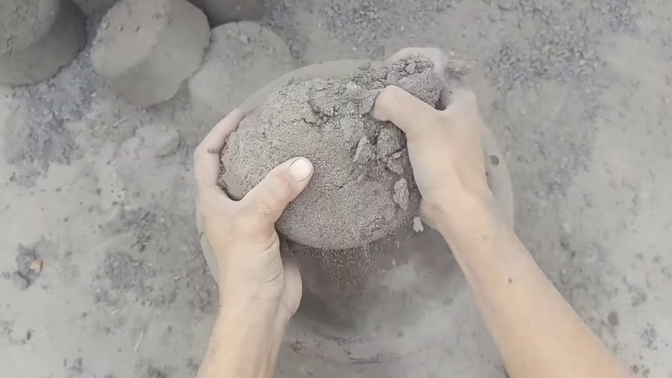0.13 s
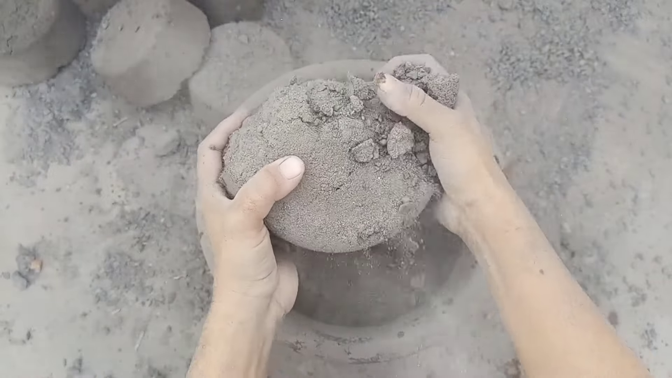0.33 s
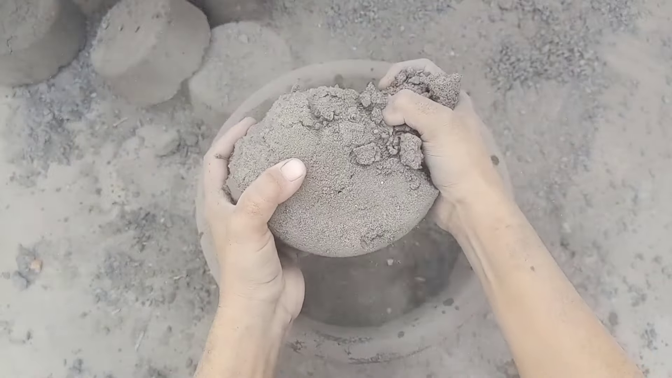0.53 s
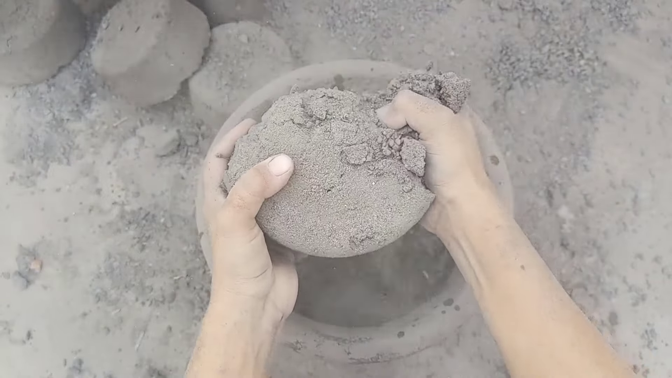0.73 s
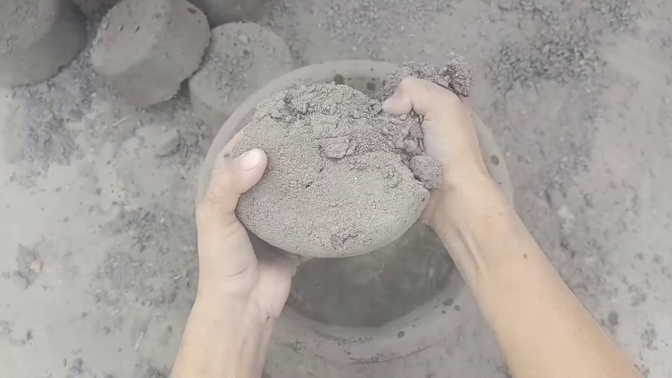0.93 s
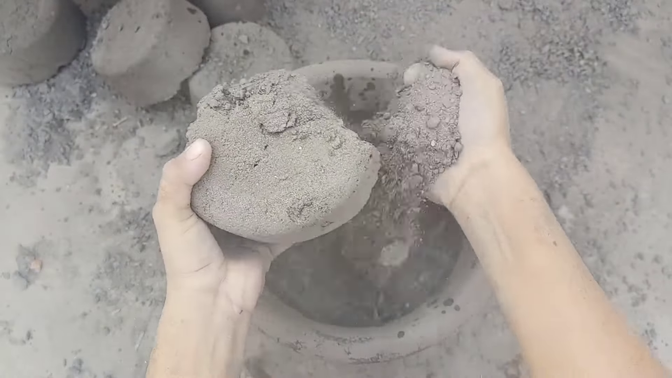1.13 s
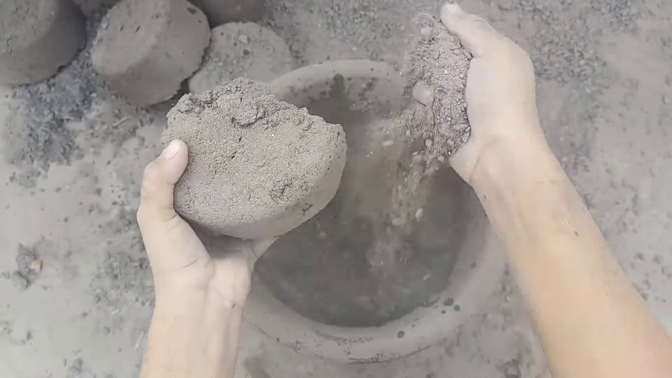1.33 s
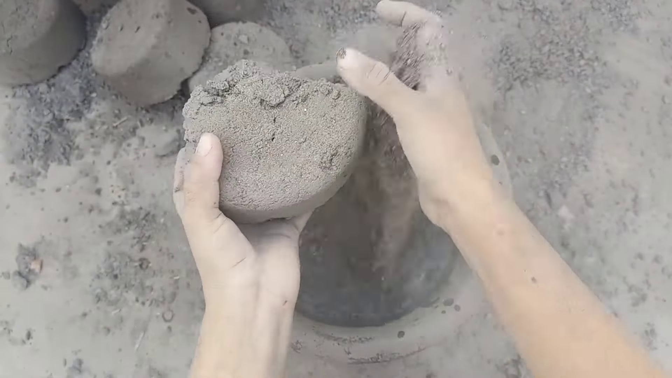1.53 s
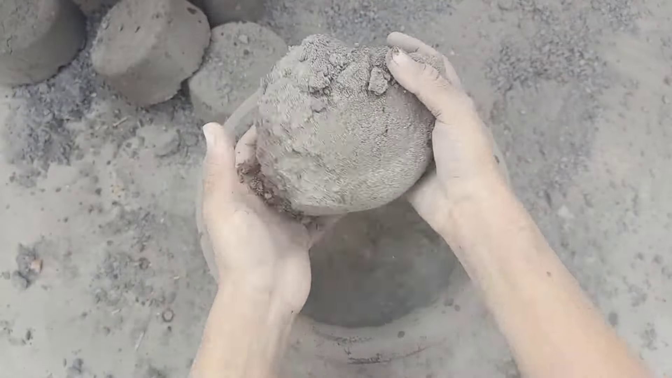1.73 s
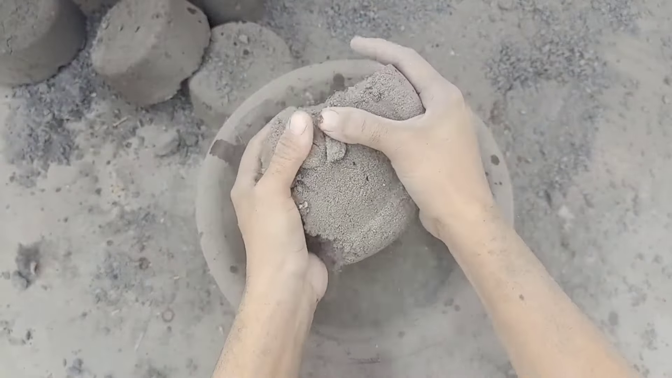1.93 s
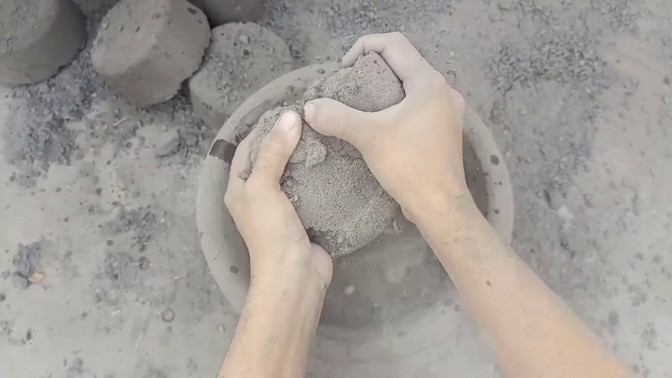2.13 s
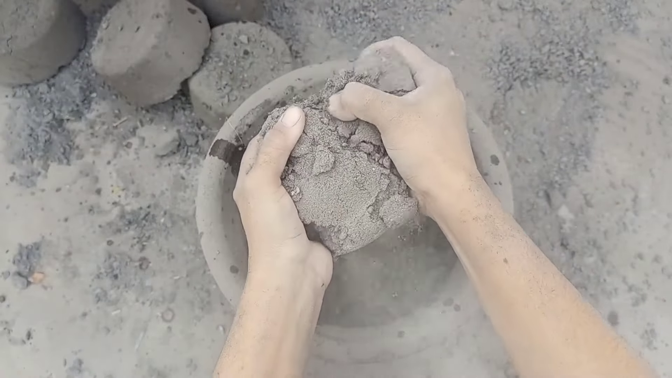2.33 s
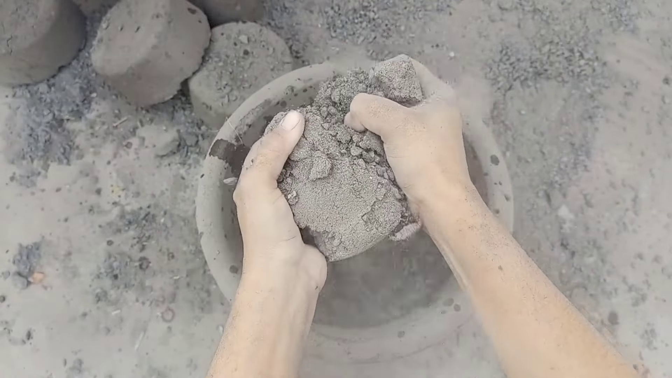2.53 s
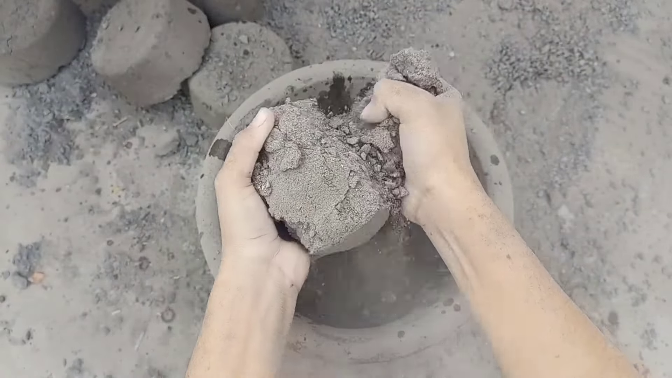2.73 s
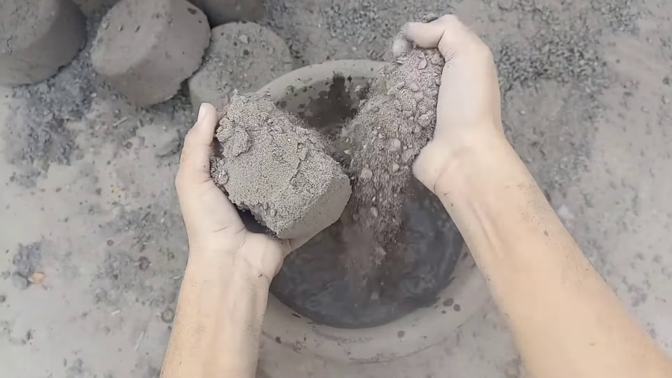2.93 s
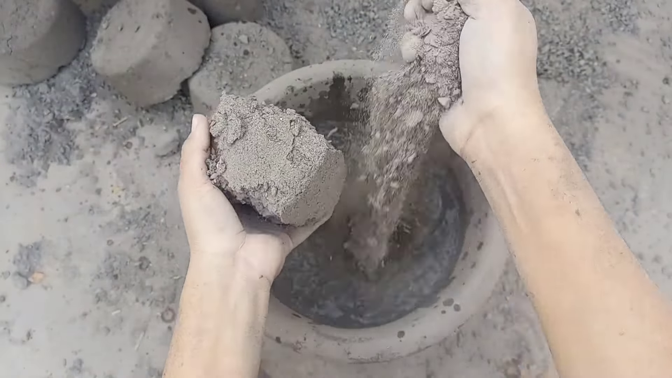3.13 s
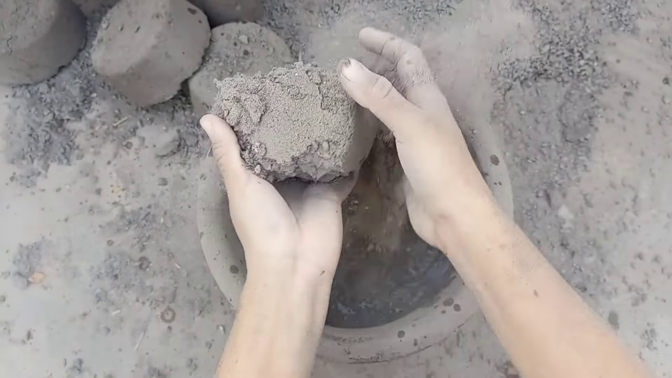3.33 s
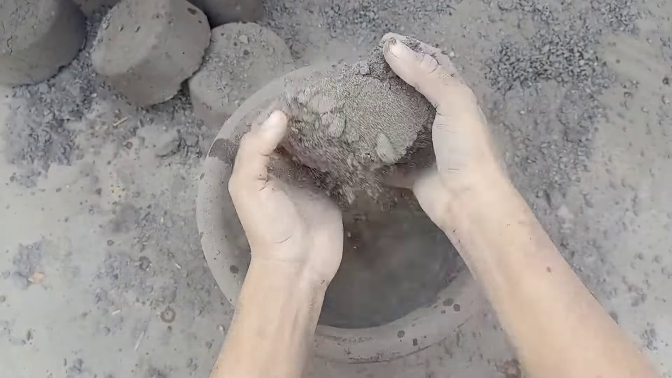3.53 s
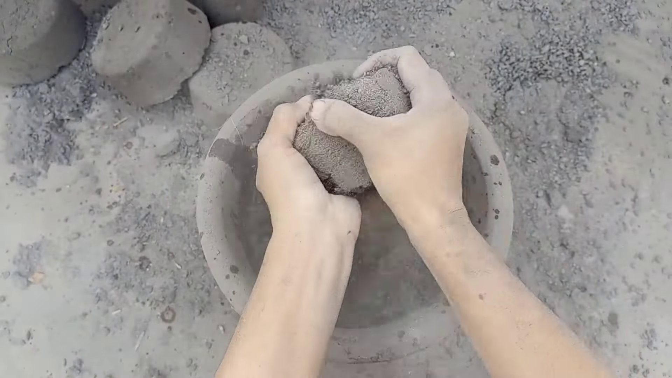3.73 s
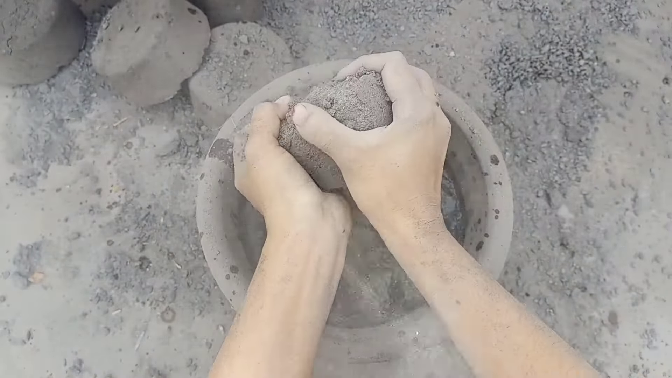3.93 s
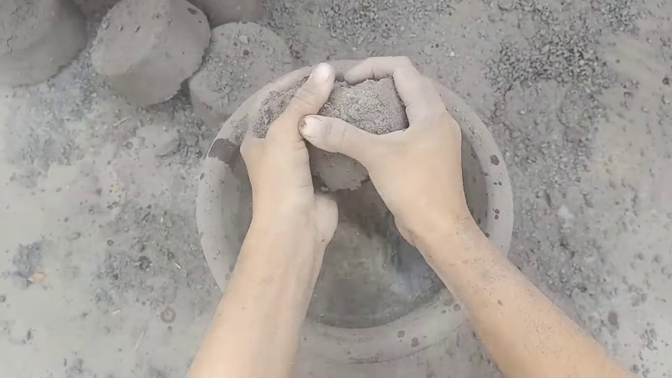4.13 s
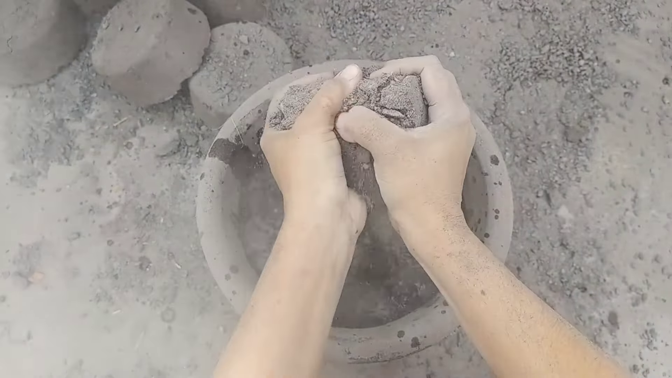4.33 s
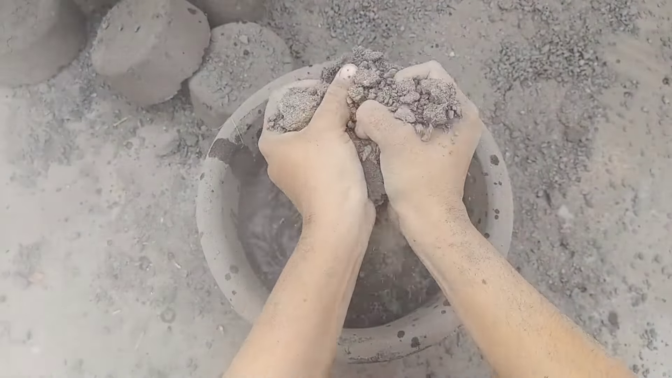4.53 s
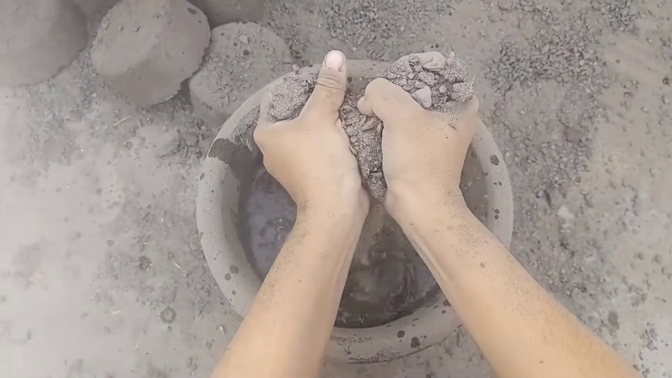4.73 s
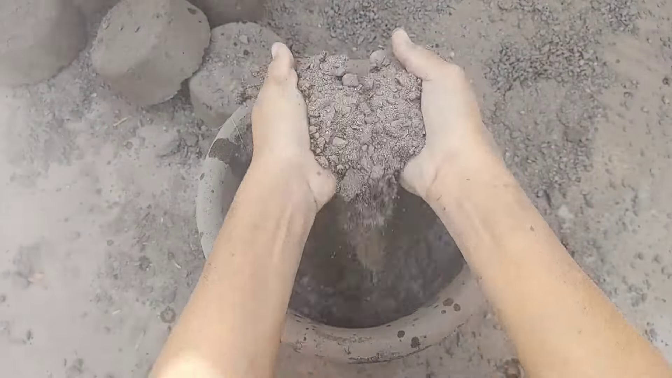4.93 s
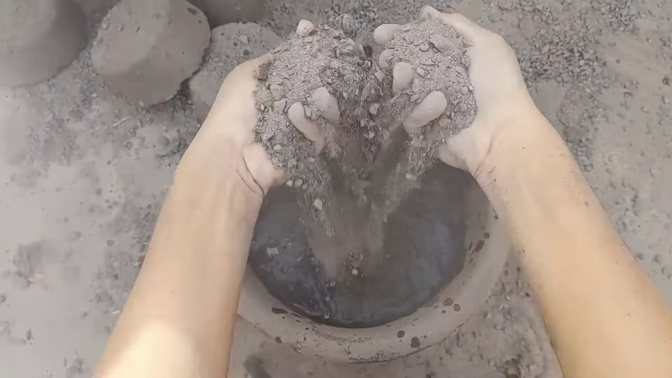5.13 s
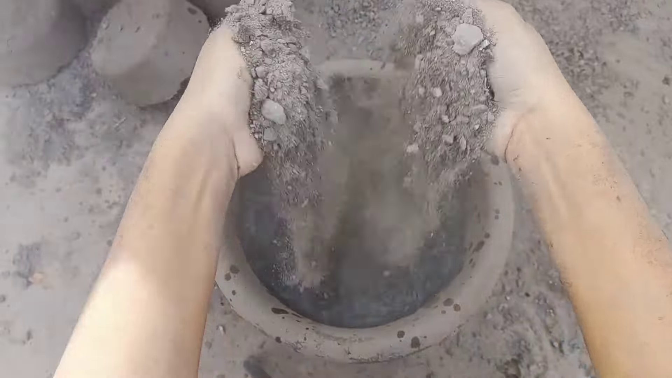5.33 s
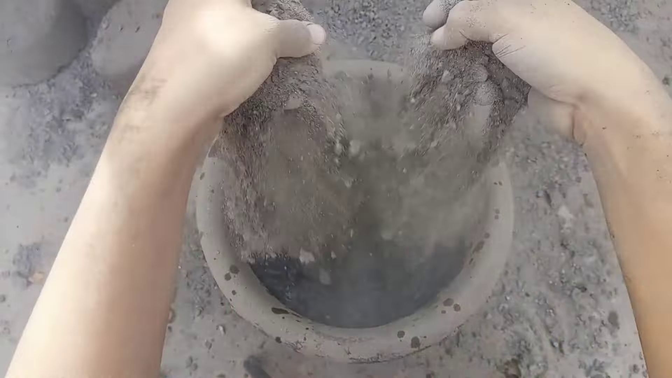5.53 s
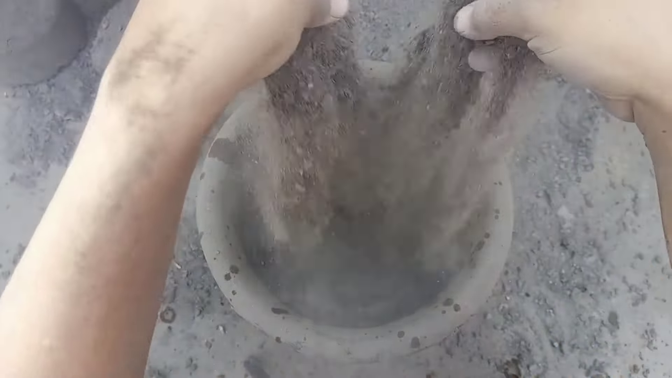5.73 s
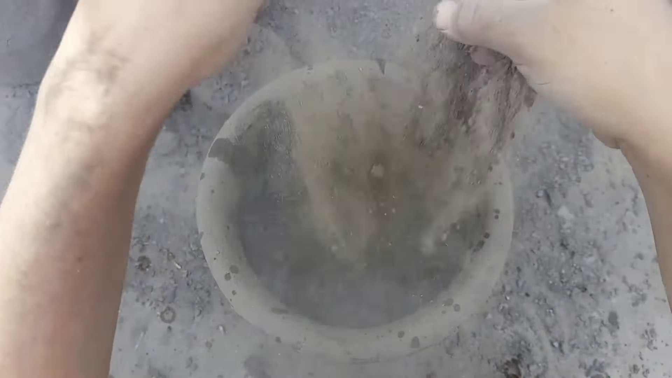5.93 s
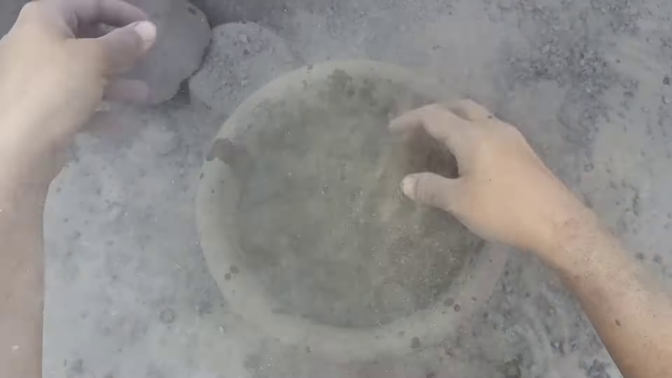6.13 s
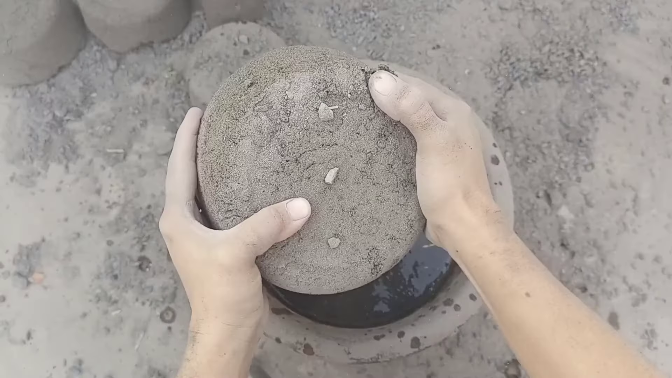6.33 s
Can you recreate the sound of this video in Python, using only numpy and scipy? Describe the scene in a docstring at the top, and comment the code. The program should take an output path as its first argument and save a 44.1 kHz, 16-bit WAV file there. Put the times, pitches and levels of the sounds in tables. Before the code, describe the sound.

Very close, dry sand-cement crumbles in hands with sharp gritty cracks. Lumps plop into a pot of water with short hollow bubbles while sand pours and fizzes in uneven bursts. A hoarse rooster calls across the yard in the first two seconds. It quietens around two and four seconds, then the last handfuls crack, pour and gurgle most densely before stopping. Faint rustle and low handling rumble lie beneath.

```python
"""Lumps plop into a pot of water, sand pours and fizzes, and grit cracks as hands crush a dry
sand-cement block close to a phone. A hoarse rooster calls across the yard; a thin tone whines briefly.
Plops, gurgle and part of the fizz are fading sine bubbles; slaps, sand and grit are shaped noise.
Cracks mix a rough ring with dust noise; the rooster is overtones and noise through throat resonances.
The whine, the handling rumble, the sloshing water and a steady rustle are filtered noise."""
import sys
import numpy as np
from scipy import signal
from scipy.fft import rfft, irfft, next_fast_len
from scipy.io import wavfile
from scipy.ndimage import uniform_filter1d, map_coordinates

SR = 44100
rng = np.random.default_rng(int(sys.argv[2]) if len(sys.argv) > 2 else 0)


def wav_record(signal):
    """Record a signal, one row per channel, as 16-bit PCM in the file named by sys.argv[1]."""
    frames = np.transpose(np.atleast_2d(signal))
    bounded = np.clip(frames, -1, 1)
    # unit amplitude maps onto the largest positive 16-bit level
    quanta = np.round(bounded * 32767).astype(np.int16)
    wavfile.write(sys.argv[1], SR, quanta)


N = 281358

# Lumps hitting the water, each trapping one bubble:
# (time [s], level [dB], starting pitch [Hz], time to fade by 60 dB [ms])
LUMPS = [(.068, -20.5, 1360, 41), (0.1112, -12, 1214, 54), (0.143, -20.5, 1036, 48), (0.1664, -6, 581, 67),
         (0.19, -13.5, 930, 37), (0.2226, -15.5, 1250, 47), (0.285, -11.5, 680, 37),
         (0.298, -11.5, 1860, 17), (0.3088, -15.5, 1257, 104), (0.3363, -11.5, 1303, 49),
         (.361, -7.5, 1060, 18), (0.404, -10, 1243, 57), (0.4232, 6, 640, 8.7), (0.4452, 13.5, 673, 11.5),
         (0.476, 0, 587, 24), (0.7073, -1.5, 700, 19), (.7615, -2.5, 676, 17), (0.9248, 1, 1260, 38),
         (0.9403, -2.5, 565, 48), (0.9798, -5, 1870, 13), (.9807, -0.5, 685, 18.6), (1.0019, -5, 684, 17),
         (1.0145, -1.5, 1340, 14.5), (1.0731, -1.5, 576, 40), (1.102, -4.5, 1470, 20),
         (1.1385, -4.5, 1160, 23), (1.1487, -11, 780, 31), (1.153, -5.5, 324, 30), (1.2894, -2, 620, 22),
         (1.2917, -6, 2700, 14), (1.3117, -4, 600, 24), (1.3416, -0.5, 564, 21), (1.3857, -8.5, 545, 25),
         (1.481, 0, 2820, 18), (1.4979, -10, 2700, 21), (1.571, -8, 2785, 10.2), (1.6024, -9.5, 2800, 40),
         (1.6883, -13, 715, 56), (1.7443, -1.5, 2510, 13.6), (1.941, -23.5, 945, 37), (2.0, -29, 1742, 30),
         (2.3126, 0.5, 686, 38), (2.3158, -8.5, 1180, 28), (2.3799, -13, 656, 34), (2.547, -4.5, 1300, 68),
         (2.65, -12, 1186, 27), (2.6651, -3, 1210, 13), (2.8214, -11.5, 1240, 44), (2.8557, -2, 2330, 10),
         (2.8575, 0, 3960, 10), (2.8788, -3, 556, 29), (2.9777, -11, 510, 37), (3.0169, 2, 474, 25.6),
         (3.0961, -13, 673, 43), (3.1049, -7, 3500, 11), (3.1385, -6, 2800, 18), (3.1709, 0.5, 2710, 11.6),
         (3.2013, -6, 690, 27.5), (3.2857, -8, 633, 36), (3.303, -11.5, 606, 58), (3.3614, -14.5, 2620, 19),
         (3.3744, -9, 603, 48), (3.4078, -13.5, 3580, 24), (3.4187, -1, 497, 38), (3.4805, -3.5, 732, 30),
         (3.5027, 3, 615, 18), (3.5432, -5, 1180, 25), (3.5477, -16, 643, 17), (3.5633, -8, 600, 28),
         (3.62, -23, 1650, 14), (3.638, -24.5, 1600, 21), (3.714, -20, 927, 36), (3.756, -25, 2140, 19),
         (3.841, -19.5, 1430, 11), (3.886, -7, 1840, 16), (3.9095, -14.5, 1265, 38), (4.0236, -15, 704, 59),
         (4.33, -28, 2720, 29), (4.426, -18, 1240, 34), (4.502, -8.5, 750, 45), (4.617, -32, 1300, 20),
         (4.6768, 7.5, 616, 17), (4.6931, -4, 800, 12), (4.749, -13.5, 770, 54), (4.7699, -3.5, 660, 23),
         (4.8557, -5.5, 660, 31), (4.955, -12, 2280, 11), (4.998, 2, 490, 23.7), (5.1084, -12, 710, 50),
         (5.1246, -10, 500, 49), (5.1743, -1, 2530, 9), (5.2747, -7.5, 590, 20), (5.2907, -5.5, 2460, 11.5),
         (5.3474, 7.5, 597, 19.5), (5.39, -13, 713, 51), (5.4247, -10.5, 776, 29), (5.4855, -17.5, 727, 75),
         (5.5661, -14, 2840, 21), (5.5904, -6, 1350, 25), (5.6791, -12, 645, 33), (5.6929, -9, 650, 19),
         (5.7046, -6, 643, 40), (5.7958, -8.5, 780, 17), (5.835, -10, 588, 35), (5.8822, -11, 676, 72),
         (5.9388, -6, 1160, 16), (5.9878, -7, 544, 76), (6.041, -6.5, 1220, 17), (6.0496, 3, 650, 24),
         (6.0662, -15, 596, 13), (6.129, -21, 1095, 53), (6.329, -34, 235, 230), (6.368, -18, 237, 39)]
# Tone colour of grit and dust: (frequency [Hz], gain [dB])
GRIT_COLOUR = [(1200, -43), (2500, -41.5), (4500, -17.5), (6500, -2.5), (7130, -9.5), (8260, -8.5),
               (9820, 3), (10900, 1.5), (13400, -13), (15200, -2), (16000, 0), (16400, -3)]


def amp(db):
    """Turn decibels into an amplitude factor."""
    return 10 ** (np.asarray(db) / 20)


def unit(x):
    """Scale a signal to an average (RMS) strength of 1."""
    return x / np.sqrt(np.mean(x ** 2) + 1e-20)


def curves(rows):
    """Draw straight lines between table rows: one value per sample for each column after the time."""
    s, *columns = np.transpose(rows)
    return [np.interp(np.arange(N) / SR, s, column) for column in columns]


def per_sample(x):
    """Read a millisecond curve at every sample."""
    return np.interp(np.arange(N) / SR * 1000, np.arange(len(x)), x)


def swells(start, length, db, rise, fall):
    """Amplitudes of events on a millisecond grid, one row each: a smooth rise, a hold, an exponential fall."""
    t = np.arange(0, N / SR + .002, .001) - np.asarray(start)[:, None]
    over = np.maximum(t - np.reshape(length, (-1, 1)), 0)
    rising = np.sin(np.pi / 2 * np.clip(t / rise, 0, 1)) ** 2
    return amp(db)[..., None] * rising * np.exp(-over / fall)


def wobble(rate):
    """A smooth random curve with this many random points a second."""
    points = rng.standard_normal(int(N * rate / SR) + 4)
    return map_coordinates(points, [np.arange(N) * rate / SR])


def filtered(x, response):
    """Multiply the spectrum of x by a response that depends on frequency."""
    m = next_fast_len(N + SR // 2)
    return irfft(rfft(x, m) * response(np.fft.rfftfreq(m, 1 / SR)), m)[:N]


def colour(points):
    """Gain read between (frequency [Hz], gain [dB]) points on a logarithmic frequency axis."""
    f, db = np.transpose(points)
    return lambda hz: amp(np.interp(np.log(hz + 1), np.log(f), db, left=-120, right=-120))


def resonant(modes):
    """Response of resonances (centre [Hz], width [Hz], level [dB]), added with alternating signs."""
    def response(f):
        return sum((-1) ** k * amp(db) * 1j * f * width / (centre ** 2 - f ** 2 + 1j * f * width)
                   for k, (centre, width, db) in enumerate(modes))
    return response


def add_at(s, sounds, total):
    """Lay short sounds, one a row, over silence at their start times."""
    at = np.round(s * SR).astype(int)[:, None] + np.arange(sounds.shape[1])
    return np.bincount(at.ravel(), sounds.ravel(), total)[:N]


def bubbles(s, db, hz, t60, rise, size):
    """Fading sines that start within about a cycle and climb in pitch as the bubble nears the surface."""
    t = np.arange(size) / SR
    db, hz, t60 = (np.asarray(v)[:, None] for v in (db, hz, t60))
    phase = 2 * np.pi * hz * t * (1 + rise * t / t60)
    soft_start = (1 - np.exp(-t * hz / 1.18)) ** 2
    ring = amp(db - 60 * t / t60) * soft_start * np.sin(phase)
    return add_at(s, ring, N + size)


def swarm(count, hz, spread, cycles, scatter_db, size):
    """Many random bubbles with pitches scattered around hz, a few of them louder than the rest."""
    when, loud = rng.random((count, 2)).T
    pitch = hz[(when * N).astype(int)] * np.exp(spread * rng.standard_normal(count))
    pitch = np.clip(pitch, 100, SR / 3)
    db = -scatter_db * np.log(loud + 0.019)
    # each fades by 60 dB in the given number of cycles, or is cut off at size samples
    return unit(bubbles(when * N / SR, db, pitch, cycles / pitch, 0.083, size=size))


def crackle(rate, scatter_db, clump_db, hiss_db):
    """Grains of unequal size, each a sharp tick with a short rough tail, in clumps, over a fine hiss."""
    hit, loud = rng.random((2, N))
    ticks = (hit < rate / SR) * amp(-scatter_db * np.log(loud + .004))  # rate: ticks a second on average
    tails = signal.lfilter([1], [1, -np.exp(-1 / (0.0003 * SR))], ticks)
    grains = unit(tails * rng.standard_normal(N))
    hiss = amp(hiss_db) * rng.standard_normal(N)
    return unit(amp(clump_db * wobble(60)) * (grains + hiss))


def streaky(x, depth_db, bins, frames):
    """Narrow bands brighten and fade as froth cavities form and burst; broad patches change faster."""
    spectrum = signal.stft(x, nperseg=512, noverlap=384)[2]
    narrow, broad = rng.standard_normal((2, *spectrum.shape))
    for _ in range(2):  # smoothing twice rounds the patches
        narrow = uniform_filter1d(uniform_filter1d(narrow, bins, axis=0), frames, axis=1)
        broad = uniform_filter1d(uniform_filter1d(broad, 5 * bins, axis=0), frames // 2, axis=1)
    patches = unit(unit(narrow) + .6 * unit(broad))
    return signal.istft(spectrum * amp(depth_db * patches), nperseg=512, noverlap=384)[1][:N]


def plops():
    """Each lump traps a bubble that rings, and slaps the surface with a short burst of noise."""
    # Tone colour of the surface breaking: (frequency [Hz], gain [dB])
    slap_colour = [(600, -30), (1500, 1), (3000, -6), (6000, -22), (15000, -15)]
    slap_db, slap_t60_s = -14.5, 0.017
    onset_db = 5  # makes up for what the soft start takes off a bubble's peak
    s, db, hz, t60_ms = np.transpose(LUMPS)
    t = np.arange(600) / SR
    bursts = amp(db[:, None] - 60 * t / slap_t60_s) * rng.standard_normal((len(s), len(t)))
    slap = filtered(add_at(s, bursts, N), colour(slap_colour))
    ring = bubbles(s, db + onset_db, hz, t60_ms / 1000, 0.033, size=4000)
    ring = filtered(ring, lambda f: (1j * f / (180 + 1j * f)) ** 2)  # thins out the bass below 180 Hz
    return ring + amp(slap_db) * slap


def pouring_levels(steady_db):
    """Add the power of handfuls breaking loose to the steady fall: gains of crumbs, sand and grit."""
    # Handfuls breaking loose:
    # (start [s], length [s], crumbs level [dB], sand level [dB], grit level [dB])
    spurts = [(0.03, 0.083, -61, -28, -28), (0.172, 0.056, -34, -21, -30), (0.308, 0.089, -47, -25, -30.5),
              (0.399, 0.027, -21, -21.5, -28.5), (0.467, 0.021, -15, -18.5, -42),
              (0.611, 0.023, -53, -29, -24), (.8, 0.018, -23, -41, -23), (0.874, 0.047, -43, -26.5, -34),
              (0.916, 0.019, -26, -33, -41), (0.977, 0.016, -39, -16.5, -44), (1.123, 0.036, -17, -21, -31),
              (1.237, 0.096, -33, -18.5, -31), (1.457, 0.077, -63, -22.5, -32),
              (1.592, 0.089, -29, -23, -32), (1.655, 0.12, -44, -20.5, -33), (1.949, 0.07, -42, -39, -34.5),
              (2.036, 0.017, -45, -53, -35), (2.076, 0.038, -52, -27.5, -32.5),
              (2.253, 0.15, -35, -24.5, -29.5), (2.453, 0.027, -35, -33, -42),
              (2.541, 0.075, -49, -24, -29), (2.637, 0.04, -27, -20.5, -37), (2.768, 0.099, -22, -18, -34),
              (2.903, 0.038, -25, -25, -27.5), (3.077, .045, -32, -21, -30), (3.122, 0.043, -51, -21, -30),
              (3.216, 0.04, -37, -23.5, -42), (3.284, 0.069, -33.5, -32, -41), (3.36, 0.025, -29, -27, -20),
              (3.456, 0.11, -23, -18, -25.5), (3.675, 0.049, -47, -42, -52), (3.743, 0.016, -49, -26, -34),
              (3.869, 0.035, -43.5, -28.5, -40), (4.011, 0.02, -34, -37, -38),
              (4.123, 0.045, -49.5, -34, -36), (4.281, 0.066, -52, -28.5, -37),
              (4.412, 0.022, -38.5, -21, -44), (4.492, 0.094, -31.5, -30, -35.5),
              (4.66, 0.044, -35, -25.5, -26), (4.726, 0.069, -21.5, -23, -25), (4.844, 0.02, -42, -23, -27),
              (4.937, 0.013, -40, -25, -43), (5.084, 0.053, -46, -20, -24.5), (5.156, 0.071, -29, -27, -35),
              (5.268, 0.065, -49, -26, -32), (5.354, 0.088, -23, -21.5, -33), (5.549, 0.04, -56, -21, -32),
              (5.571, .05, -24.5, -22, -34), (5.67, 0.06, -27, -25, -18.5), (5.835, 0.12, -23, -26, -32),
              (5.976, 0.14, -50, -21, -30), (6.109, 0.05, -44, -23.5, -28.5), (6.22, 0.04, -46.5, -41, -38),
              (6.37, .03, -17, -9.5, -14)]
    rise_s, fall_s = 0.02, 0.0095
    start, length, *spurt_db = np.transpose(spurts)
    power_shapes = swells(start, length, np.zeros(len(start)), rise_s, fall_s) ** 2
    spurt_power = [per_sample(v) for v in amp(spurt_db) ** 2 @ power_shapes]
    return np.sqrt(amp(steady_db) ** 2 + spurt_power)


def crumb_bubbles(gurgle_hz):
    """Larger and small crumbs make bubbles that gurgle through the pot's air resonances."""
    # Air inside the pot: (centre [Hz], width [Hz], level [dB])
    pot_modes = [(554, 360, -4.5), (1323, 170, 3.5), (2440, 280, -13.5)]
    pot = resonant(pot_modes)
    large = swarm(count=1500, hz=gurgle_hz, spread=0.1493, cycles=26, scatter_db=4, size=1400)
    small = swarm(count=2500, hz=np.full(N, 1350), spread=0.211, cycles=46, scatter_db=5.5, size=800)
    return unit(filtered(large, pot)), unit(filtered(small, pot))


def sand_surface(fizz_hz):
    """Sand grains crackle and tiny bubbles fizz on the water; finer sand fizzes higher and is brighter."""
    # Tone colour of the sand: (frequency [Hz], gain [dB])
    sand_colour = [(940, 0), (1600, -3), (2120, -1), (2740, 4.5), (3110, -4.5), (3360, -2), (3860, -7),
                   (4600, -2.5), (6890, -5.5), (8500, -19), (11000, -61), (18700, -120)]
    fine_hz, fine_grows_db = 3630, 6.5  # start of the fine band; its gain over the rest, dB per fizz octave
    fizz = swarm(count=2500, hz=fizz_hz, spread=0.2094, cycles=210, scatter_db=2.0, size=800)
    sand = crackle(rate=1800, scatter_db=4.8, clump_db=3, hiss_db=-3)
    sand = unit(filtered(streaky(sand, depth_db=6, bins=2, frames=24), colour(sand_colour)))
    fine = filtered(sand, lambda f: 1 / (1 + (fine_hz / (f + 1)) ** 8))
    coarse = sand - fine
    tilt = amp(fine_grows_db / 2 * np.log2(fizz_hz / fine_hz))
    return unit(fine * tilt + coarse / tilt + amp(-9.5) * fizz)


def grit_in_hands():
    """Grit rubs in the hands: uneven grains and hiss with a bright tone colour."""
    grit = crackle(rate=970, scatter_db=5.5, clump_db=2.0, hiss_db=-1.0)
    return unit(filtered(streaky(grit, depth_db=1.5, bins=8, frames=6), colour(GRIT_COLOUR)))


def pouring():
    """Gurgling crumbs, fizzing sand and rubbing grit rise and fall with the flow."""
    # Steady fall: (time [s], crumbs level [dB], sand level [dB], grit level [dB],
    # fizz pitch [Hz], gurgle pitch [Hz])
    trickle = [(0, -52, -34.5, -33, 4850, 590), (.27, -45.5, -30.5, -32, 4500, 652),
               (.46, -20.5, -33.5, -37.5, 3460, 681), (.66, -36, -34.5, -33, 6130, 735),
               (.8, -32, -34.5, -33.5, 3040, 776), (1.14, -23, -34.5, -33, 4300, 678),
               (1.36, -30, -28, -29, 3240, 608), (1.5, -42.5, -35, -36.5, 2840, 497),
               (1.74, -28, -21.5, -25, 3590, 700), (1.83, -42, -43.5, -41, 2840, 710),
               (2.18, -59, -39, -39, 4200, 668), (2.5, -51, -37.5, -37, 3820, 630),
               (2.75, -37, -31, -34, 3016, 637), (3.0, -35, -27, -31, 4310, 514),
               (3.39, -33.5, -24, -32.5, 3110, 602), (3.56, -33, -49, -34, 3420, 602),
               (3.62, -61, -44.5, -36, 3710, 663), (4.16, -57, -41.5, -38, 4480, 607),
               (4.46, -45, -36, -38, 4220, 699), (4.82, -29, -24, -34.5, 4960, 670),
               (5.0, -28.5, -30.5, -34.5, 3440, 532), (5.21, -31, -21.5, -28, 2950, 608),
               (5.53, -41.5, -28, -27, 4900, 683), (5.7, -18.5, -18.5, -24.5, 4300, 650),
               (5.81, -38, -27.5, -31.5, 5200, 642), (6.06, -21, -22.5, -25, 5240, 608),
               (6.25, -60, -33, -35.5, 5760, 700), (6.38, -49, -46, -49, 4670, 735)]
    # small crumbs follow the crumbs by this share and the sand by the rest
    small_db, small_follows = -4.5, 0.72
    *steady_db, fizz_hz, gurgle_hz = curves(trickle)
    crumb_gain, sand_gain, grit_gain = pouring_levels(steady_db)
    small_gain = amp(small_db) * crumb_gain ** small_follows * sand_gain ** (1 - small_follows)
    crumbs, small = crumb_bubbles(gurgle_hz)
    in_water = crumb_gain * crumbs + small_gain * small + sand_gain * sand_surface(fizz_hz)
    return in_water + grit_gain * grit_in_hands()


def cracks():
    """Each snap lasts a few milliseconds: a rough ring of the fragment and a bright spit of dust."""
    # Grit snapping: (time [s], level [dB], ring pitch [Hz], dust share [0-1])
    snaps = [(0.083, -2, 6050, 0.54), (0.157, -3, 7140, 0.8), (0.181, 6, 4220, 0.85),
             (0.243, -2.5, 6260, 0.55), (0.2857, 2.5, 4120, 0.74), (0.422, -6, 4700, 0.7),
             (0.4777, 0.5, 6900, 0.66), (0.5521, -6, 5540, 0.97), (0.6, 3, 6530, 0.6),
             (0.8123, -4, 6320, 0.46), (0.8738, -2, 6890, 0.8), (0.9882, -1, 6360, 0.44),
             (1.1395, -3.5, 5200, 0.7), (1.291, 3.5, 4160, 0.15), (1.4422, -6.5, 3890, 0.15),
             (1.481, -4, 4900, 0.4), (1.603, 4, 3640, 0.24), (1.915, -11, 4200, 0.93),
             (1.962, -8.5, 3480, 0.53), (2.0426, -10, 5070, 0.9), (2.332, 5.5, 5680, 0.84),
             (2.3553, -4.5, 4140, 0.15), (2.5284, -8, 4160, 1), (2.6655, -7, 5140, 0.3),
             (2.7913, -1, 5720, 0.86), (2.8155, -3, 5630, 0.2), (2.8569, -5, 4000, 0.5),
             (2.911, -5, 4380, 0.45), (2.9697, -3, 4200, 0.3), (3.0664, -0.5, 4870, 0.43),
             (3.1048, -14, 3570, 0.4), (3.138, 1, 5130, 0.37), (3.2121, 5, 7140, 0.4),
             (3.2879, 0, 4440, 0.6), (3.3308, -4.5, 4600, 0.2), (3.3764, -1, 7000, 0.74),
             (3.4077, -12, 3610, 0.6), (3.455, -5, 5090, 0.9), (3.501, -3, 4930, 0.3),
             (3.7574, -2, 4570, 0.87), (3.8883, -4.5, 6700, 0.5), (4.4283, -2, 4210, 0.63),
             (4.6763, -8, 4760, 0.8), (4.7496, -2, 5240, 0.7), (4.853, -6, 6490, 0.5),
             (4.8688, 7.5, 5660, 0.42), (5.1733, 0.5, 3720, 0.45), (5.288, 5, 7400, 0.27),
             (5.3133, 1, 6830, 0), (5.3543, 2, 7200, 0.56), (5.437, 3.5, 6070, 0.97),
             (5.5288, 5.5, 5700, 0.72), (5.5501, 4, 4780, 0.16), (5.6043, 9, 4470, 0.57),
             (5.686, -11, 5980, 0.7), (5.7399, 1.5, 6900, 0.27), (5.8267, 3.5, 6430, 0.17),
             (5.9933, 2, 6000, 0.3), (6.023, -0.5, 4250, 0.2), (6.2031, 1, 4100, 0.67)]
    ring, spit, t = np.zeros(N + 500), np.zeros(N + 500), np.arange(500) / SR
    for s, db, hz, share in snaps:
        rough, dust = rng.standard_normal((2, 500))
        share = np.clip(share, 0, 1)
        shape = amp(db - 60 * t / .013) * (1 - np.exp(-t / .0008))
        flutter = unit(np.convolve(rough, np.hanning(24), "same"))
        first = round(s * SR)
        ring[first:][:500] += (1 - share) * shape * (.8 + .7 * flutter) * np.sin(2 * np.pi * hz * t)
        spit[first:][:500] += share * shape * dust
    return ring[:N] + amp(-1.5) * filtered(spit[:N], colour(GRIT_COLOUR))


def rooster():
    """Overtones of an unsteady pitch, hoarse with noise once a cycle, pass the throat and yard echoes."""
    # Notes of the call: (start [s], length [s], starting pitch [Hz], glide [Hz/s],
    # starting level [dB], swell [dB/s], roughness [0-1])
    notes = [(0.425, 0.18, 366.2, 9.5, -27, -32, 0.37), (0.719, 0.15, 276.5, -10, -18, -55, 0.33),
             (0.92, 0.353, 277.5, 18, -21.5, 4, .53), (1.63, 0.34, 700.6, -110, -21.5, -62, 0.15)]
    # Throat resonances: (centre [Hz], width [Hz], level [dB])
    throat_modes = [(783, 136, 3), (1405, 337, 4), (2110, 730, -4)]
    rise_s, fall_s = 0.018, 0.022
    start, length, hz, glide, db, swell, rough = np.transpose(notes)
    time = np.arange(N) / SR
    note = np.clip(np.searchsorted(start, time) - 1, 0, None)  # which note each sample belongs to
    since = np.clip(time - start[note], 0, length[note])
    gain = per_sample(swells(start, length, db, rise_s, fall_s).sum(0)) * amp(swell[note] * since)
    hz, rough = hz[note] + glide[note] * since, np.clip(rough[note], 0, 1)
    phase = 2 * np.pi * np.cumsum(hz * (1 + 0.06 * rough * wobble(25))) / SR
    pulses = sum(np.cos(k * phase) for k in range(1, 10)) / np.sqrt(4.5)
    hoarse = 2.0 * rng.standard_normal(N) * (1 + np.cos(phase))
    throat = resonant(throat_modes)
    voice = filtered(gain * ((1 - rough) * pulses + rough * hoarse), lambda f: throat(f) ** 2)
    t = np.arange(SR // 2) / SR
    echoes = rng.standard_normal(len(t)) * amp(-60 * t / 0.63)  # fade by 60 dB in 0.63 s
    echoed = signal.fftconvolve(voice, echoes / np.linalg.norm(echoes))[:N]
    return amp(3.0) * voice + amp(4.0) * echoed


def whine():
    """A thin unsteady tone: noise in one narrow resonance, swelling in and out."""
    # The tone: (start [s], length [s], centre [Hz], width [Hz], level [dB])
    thin_tone = (.85, .45, 5300, 50, -38)
    start, length, hz, width, db = thin_tone
    resonance = resonant([(hz, width, 0)])
    tone = unit(filtered(rng.standard_normal(N), lambda f: resonance(f) ** 2))
    return per_sample(swells([start], length, db, 0.087, .04)[0]) * tone


def sloshing():
    """Low noise of the moving water, which each lump pushes: the lower its bubble, the harder the push."""
    calm_db, heave_db, heave_fall_s = -51.5, -49, 0.026
    typical_hz, size_power = 600, 4.8  # bubble pitch of a typical lump; how steeply size adds to the push
    s, db, hz, _ = np.transpose(LUMPS)
    strength = amp(db + heave_db) * (typical_hz / hz) ** size_power
    pushes = np.bincount(np.round(s * SR).astype(int), strength, N)
    gain = amp(calm_db) + signal.lfilter([1], [1, -np.exp(-1 / (heave_fall_s * SR))], pushes)
    low = colour([(110, -45), (150, -1), (240, 4.5), (400, 0), (480, 0)])
    return gain * unit(amp(5.3 * wobble(25)) * filtered(rng.standard_normal(N), low))


def handling_rumble():
    """Steady low noise of handling that swells whenever the phone is jolted."""
    # Jolts of the phone: (start [s], length [s], level [dB])
    jolts = [(.55, .04, -66), (1.26, 0.039, -49), (1.71, 0.037, -53), (2.215, .06, -46), (2.5, 0.23, -54),
             (2.835, .03, -55), (3.07, .06, -56), (3.365, 0.11, -57), (3.71, 0.034, -53), (3.89, .06, -47),
             (4.357, .04, -53), (4.54, .13, -50)]
    rumble_db, rise_s, fall_s = -59, 0.021, 0.021
    s, length, db = np.transpose(jolts)
    gain = amp(rumble_db) + per_sample(swells(s, length, db, rise_s, fall_s).sum(0))
    low = colour([(20, -7), (55, -10), (75, -0.5), (130, -4.5), (160, -20)])
    return gain * unit(filtered(rng.standard_normal(N), low))


def yard_rustle():
    """A steady rustle: noise with a fixed tone colour."""
    # Tone colour of the rustle: (frequency [Hz], gain [dB])
    rustle_colour = [(210, -42), (350, 13), (498, 19.5), (1040, -28), (1340, 18), (2160, -4), (3080, -19),
                     (8180, -19), (9000, 0), (11700, -37), (19800, -120)]
    return amp(-52) * unit(filtered(rng.standard_normal(N), colour(rustle_colour)))


def scene():
    """Add all sources; the pouring and the rustle drop abruptly in level for a moment."""
    # The drop: (from [s], to [s], level change [dB])
    lull = (6.27, 6.365, -9)
    begin, end, drop_db = lull
    t = np.arange(N) / SR
    lull_gain = amp(drop_db * ((t > begin) & (t < end)))
    events = plops() + cracks() + rooster() + whine()
    return (events + handling_rumble() + sloshing() + lull_gain * (pouring() + yard_rustle()))[None]


def record(dry):
    """The phone rounds off the highest peaks and keeps nothing above its band limit."""
    ceiling, top_hz = .96, 15900
    soft = dry[0] / (1 + np.abs(dry[0] / ceiling) ** 6) ** (1 / 6)
    return filtered(soft, lambda hz: hz < top_hz)[None]


dry = scene()
out = record(dry)
wav_record(out)
```